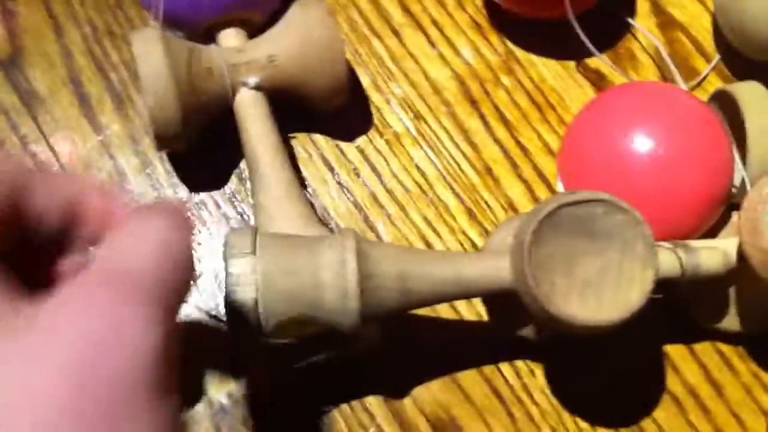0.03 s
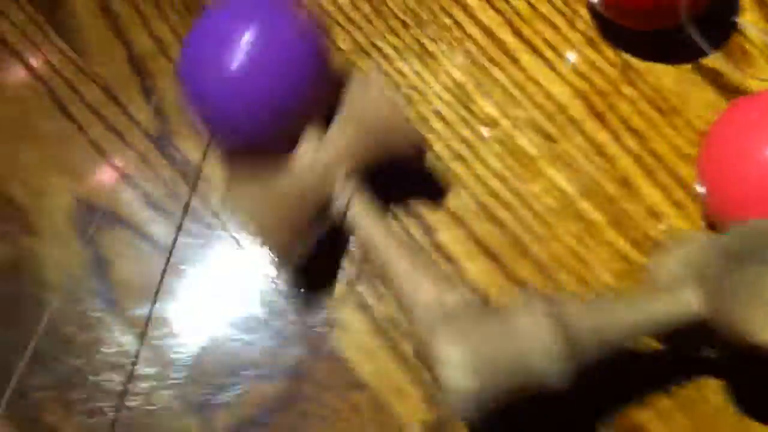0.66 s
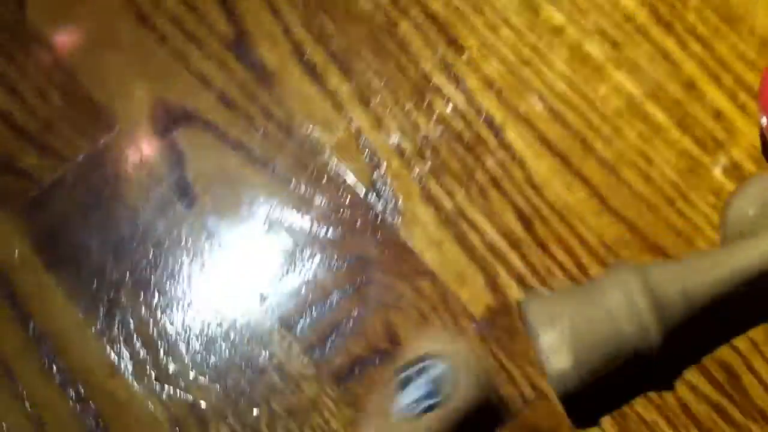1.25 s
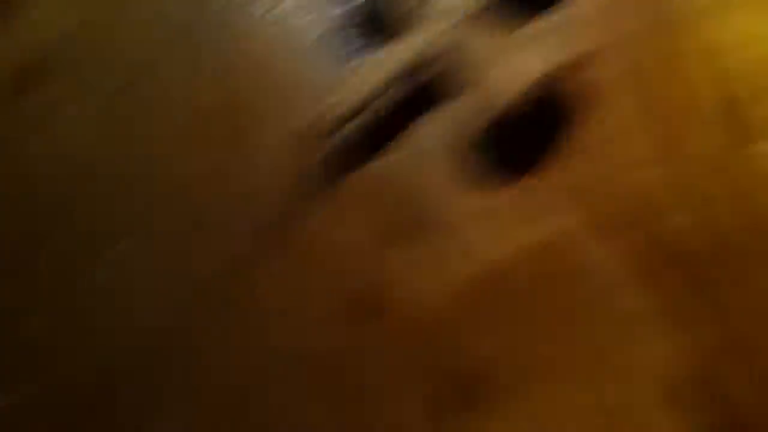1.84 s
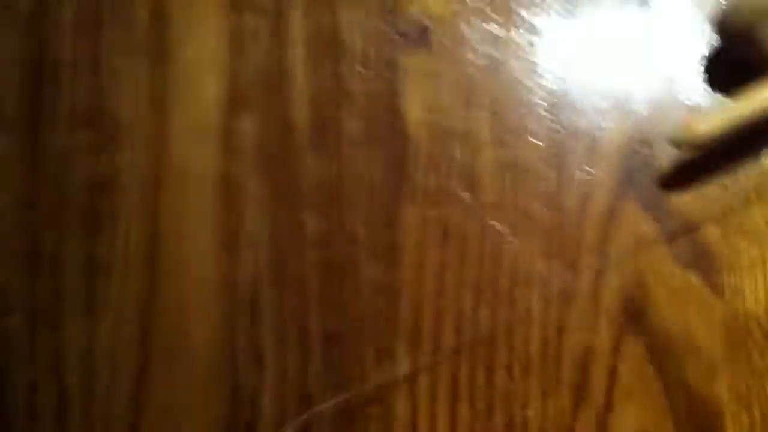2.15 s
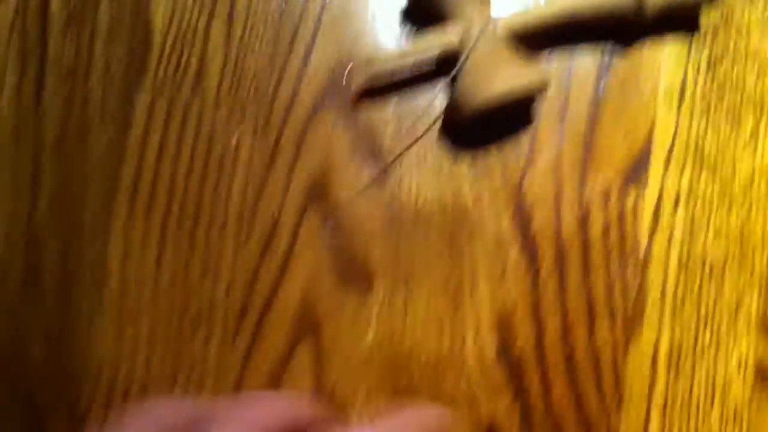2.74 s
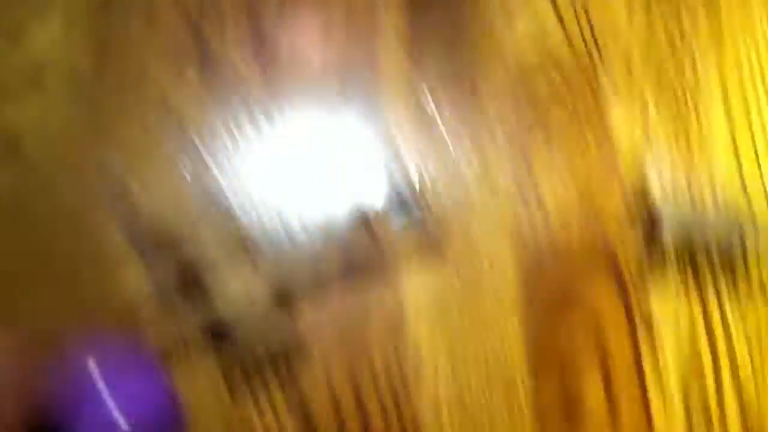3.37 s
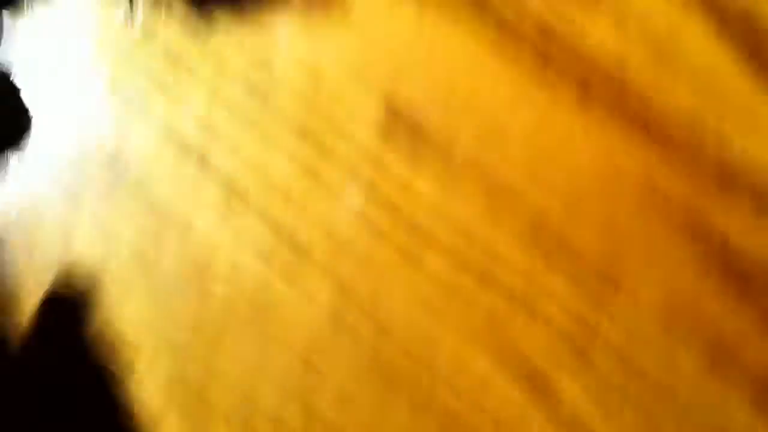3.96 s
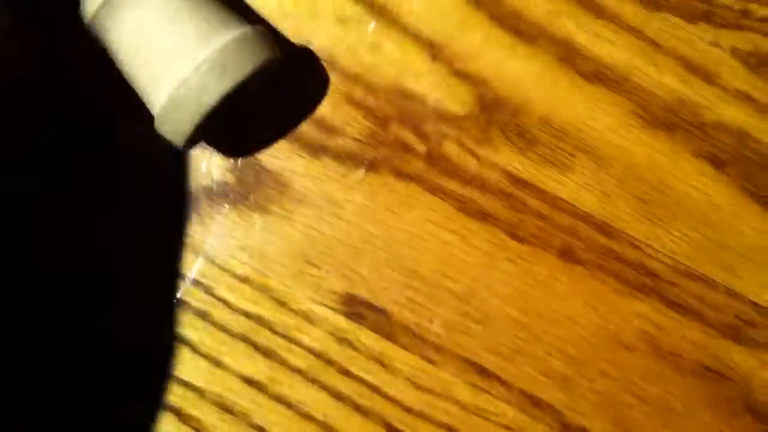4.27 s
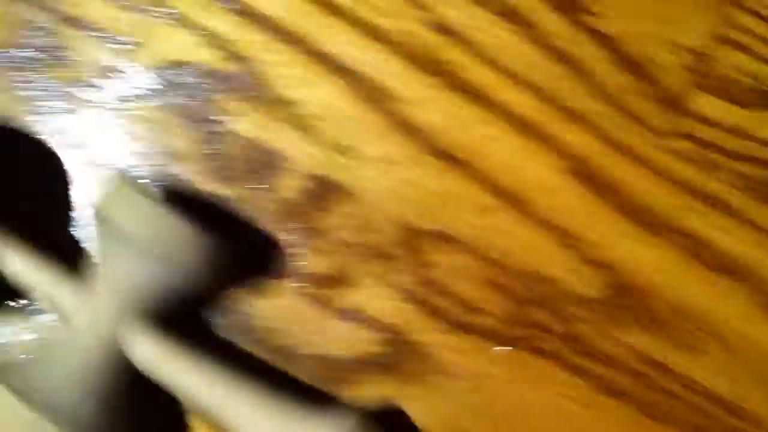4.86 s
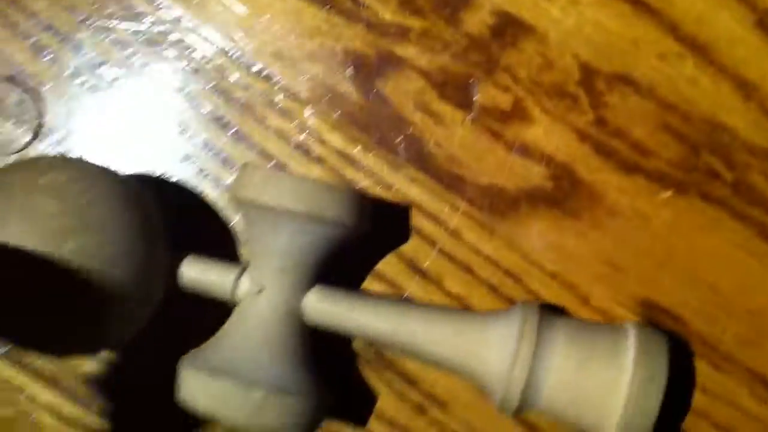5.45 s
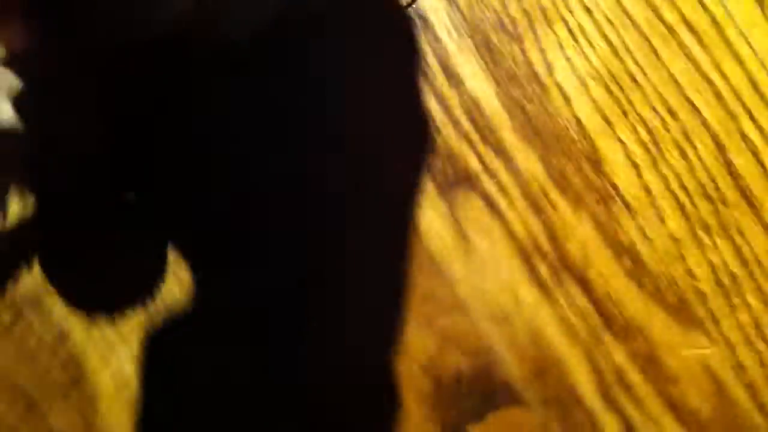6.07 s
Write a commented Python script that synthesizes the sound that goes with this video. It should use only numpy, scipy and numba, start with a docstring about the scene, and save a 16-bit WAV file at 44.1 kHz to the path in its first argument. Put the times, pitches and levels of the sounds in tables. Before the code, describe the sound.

Close to the microphone in a small room, wooden toys tap and clatter against each other and a wooden tabletop. One slides across the table with a bumpy, rumbling scrape, then things go briefly quiet. Harder hollow knocks and short shoves follow, ending with a burst of sharp clacks. Faint hand rubbing and string swishes sit underneath, along with a low electrical hum and hiss.

```python
"""Wooden kendama toys, pushed, rolled and dropped on a varnished table in a small room, microphone close.
Each knock rings the toys and the table top, and some hard clacks end in a run of bounces.
Pulled by its string, a toy judders; between knocks it skips and drags over the grain.
String and fingers swish now and then and a hand rubs softly near the microphone.
Near walls add a short tail; under it all lie a faint mains hum and hiss."""
import sys
import numpy as np
from scipy import signal
from scipy.fft import rfft, irfft
from scipy.io import wavfile
from scipy.ndimage import uniform_filter1d
from numba import njit

SR = 44100
rng = np.random.default_rng(int(sys.argv[2]) if len(sys.argv) > 2 else 0)


def log_audio(samples):
    """Write samples as a 16-bit WAV file to the path given in sys.argv[1]."""
    # one column per channel
    frames = np.atleast_2d(samples).T
    # limit to full scale, then quantise
    limited = np.clip(frames, -1, 1)
    pcm = np.round(limited * 32767).astype(np.int16)
    wavfile.write(sys.argv[1], SR, pcm)


N = 273861
TIME = np.arange(N) / SR

# borders of the ranges of table thud, hollow cup, handle, clack, hard edge and contact tick: edge_hz
RANGE_EDGES = [255, 480, 1050, 1750, 2700, 4200, 15000]
# modes of the toys lying on the table: pitch_hz, level_db, t60_s
TOY_MODES = [(262, -13, 0.0134), (355, 5, 0.02), (423, 1, 0.0046), (594, 4.5, 0.02), (720, 2.5, 0.0087),
             (859, -9.5, 0.07), (1038.4, 5.5, 0.01), (1143, 1, 0.016), (1346, -11.5, 0.055),
             (1647, -3.5, 0.012), (2123, 0.5, 0.007), (2100, -16.5, 0.042), (2620, 9, 0.0016),
             (3000, -15.5, 0.007), (2976, 18, 0.016), (3570, 15, 0.017), (4300, 22.5, 0.052),
             (5530, 25.5, 0.021), (7500, 22, 0.034), (8600, 19, 0.023), (13600, -6.5, 0.012)]
# long, low modes of the table top: pitch_hz, level_db, t60_s
TABLE_MODES = [(173.8, 0.5, 0.35), (228.9, -2, 0.29), (273.5, -4.5, 0.34), (310.6, 6.5, 0.053),
               (459, -21.5, 0.44), (544, -0.5, 0.12)]


def knocks(blows, crack_db, detune, main_db, main_t60_s=0.02, low_cut_hz=205):
    """Every knock favours one ring; its contact shares the energy between table, cup, handle and edge."""
    starts, level_db, main_hz, corner_hz, tick_db, thud_db = blows
    sounds, attack = 0, int(.012 * SR)
    main_rings = np.array([band(ring([(hz, 0, main_t60_s)], .05), hz / 1.5, hz * 1.5) for hz in main_hz])
    for lo, hi in zip(RANGE_EDGES, RANGE_EDGES[1:]):
        favoured = ((lo <= main_hz) & (main_hz < hi))[:, None]
        part = struck_wood(len(starts), lo, hi, crack_db, detune)
        part += favoured * undb(main_db) * main_rings / rms(main_rings)
        gains = contact(lo, hi, level_db, main_hz, corner_hz, tick_db, thud_db)
        sounds = sounds + gains[:, None] * part / rms(part[:, :attack])
    out = np.zeros(N)
    for start, sound in zip(starts, minimum_phase(sounds)):
        add(out, start, sound)
    # such small bodies radiate little bass
    return signal.sosfilt(signal.butter(5, low_cut_hz, "high", fs=SR, output="sos"), out)


def blows_and_bounces(scatter_db=3.5, pitch_spread=0.071, tick_db=-68, thud_db=-5.5):
    """The columns of all blows, single or in runs of bounces; each bounce lands on another spot."""
    # single knocks: start_s, level_db, main_hz, corner_hz, tick_db, thud_db (relative to level_db)
    single_knocks = [(0.2124, -46.5, 554, 778, -76, 0), (0.4495, -49.5, 506, 504, -84, 0),
                     (0.5385, -41, 520, 1200, -62, 1.5), (0.7577, -31, 1530, 2100, -62, -4),
                     (0.7677, -47, 1500, 1900, -62, 10), (0.8062, -39.5, 1400, 1700, -64, -2),
                     (0.8838, -39, 540, 1800, -74, -5), (0.9625, -39.5, 1990, 1940, -68, 2),
                     (1.0044, -31, 2250, 3650, -47, -1), (1.0306, -38.5, 2100, 2510, -78, 0),
                     (1.0818, -35.5, 686, 850, -85, 2), (1.0975, -29.5, 576, 910, -73, -3),
                     (1.1765, -36.5, 725, 1522, -69, 3), (1.2435, -31, 603, 940, -62.5, -6),
                     (1.2645, -42, 620, 830, -70, 10.5), (1.2772, -31, 720, 880, -64, -2.5),
                     (1.29, -42, 720, 871, -73, 2), (1.3033, -39, 736, 950, -64, -2),
                     (1.317, -33.5, 693, 880, -78, -3.5), (1.3485, -26, 2280, 3650, -37.5, 0.5),
                     (1.3858, -35, 2470, 3200, -50, 6), (1.406, -40, 2174, 2870, -59, 6.5),
                     (1.4725, -36, 525, 1050, -66, -1.5), (1.5262, -34.5, 570, 1313, -53, 3),
                     (1.6646, -38.5, 633.4, 1192, -68, 1.5), (2.108, -55.5, 642, 1710, -62.5, -5),
                     (2.914, -43.5, 710, 960, -77, -16), (3.128, -47, 990, 1460, -82, -8),
                     (3.152, -64, 990, 1500, -78, 3), (3.2138, -46.5, 1263, 2100, -79, 3),
                     (4.2131, -39.5, 586.5, 536.2, -59, 1.5), (4.2372, -38.5, 685.6, 578.5, -64.5, -3),
                     (4.3949, -38.5, 545, 1297, -68, 0), (4.4415, -44, 539.4, 1602, -83, 5),
                     (4.4602, -20, 1266, 1730, -46.5, -2), (4.4615, -28, 2120, 2450, -45.5, -14),
                     (4.4842, -43.5, 465, 520.5, -76, 8.5), (4.5395, -45, 930, 1187, -81, 3.5),
                     (4.648, -38.5, 553, 1150, -76, -1), (4.755, -19.5, 1032, 1240, -38, -0.5),
                     (4.9046, -46.5, 1416, 2000, -73, 5.5), (4.957, -51.5, 1740, 2095, -75, 4),
                     (4.9651, -42, 1710, 2408, -76, 1.5), (4.9879, -42, 601.6, 1850, -88, -5),
                     (5.0399, -40, 770, 630, -84, 1), (5.287, -28.5, 850.7, 1148, -62, 1),
                     (5.3342, -27.5, 608, 758, -67, -4.5), (5.357, -34, 611.4, 400, -69, -3.5),
                     (5.4247, -47.5, 606, 1795, -87, -10), (5.4874, -34, 790, 845, -49, 1.5),
                     (5.5516, -36, 542, 875, -68.5, -1), (5.8448, -34, 944, 1037, -51, 3),
                     (5.8988, -44, 550, 534, -76, 4.5), (6.0732, -29, 767, 1390, -48, -2.5),
                     (6.089, -27.5, 930, 920, -50.5, -1.5), (6.1015, -37, 870, 980, -65, 6),
                     (6.1423, -28, 1450, 2500, -45, -7), (6.148, -40, 885, 3000, -41.5, -10),
                     (6.1526, -20, 1130, 2730, -38.5, -2), (6.1538, -19, 810, 1000, -46, -8),
                     (6.1618, -51, 905, 2600, -54, 7), (6.1812, -26.5, 880, 1370, -51, -1)]
    # runs after a hard clack: start_s, end_s, gap_s, uneven (0-1), first_db, last_db, main_hz, corner_hz
    bounce_runs = [(0.778, .84, 0.012, 0.17, -37, -46, 1430, 1920),
                   (1.037, 1.06, 0.0095, 0.39, -40.5, -49.5, 1930, 2400),
                   (1.371, 1.429, .014, 0.2, -47, -45.5, 1350, 2790)]
    rows = list(single_knocks)
    for start, end, gap, uneven, first_db, last_db, main_hz, corner_hz in bounce_runs:
        for s, (jitter, softness, spot) in zip(np.arange(start, end, gap), rng.standard_normal((12, 3))):
            level_db = np.interp(s, [start, end], [first_db, last_db]) - scatter_db * softness
            pitch_hz = main_hz * np.exp(pitch_spread * spot)
            rows.append((s + uneven * gap * jitter, level_db, pitch_hz, corner_hz, tick_db, thud_db))
    return np.transpose(rows)


def contact(lo, hi, level_db, main_hz, corner_hz, tick_db, thud_db):
    """Gain of one range, falling above the contact's corner: a harder contact passes more treble."""
    fall_db_per_octave, ring_db_per_octave, tick_db_per_octave = 24, 2.5, -1
    centre_hz = np.sqrt(lo * hi)
    fall = 1 / np.hypot(1, undb(fall_db_per_octave * np.log2(centre_hz / corner_hz)))
    # high toy-on-toy clacks ring more strongly
    ring_db = ring_db_per_octave * np.log2(main_hz / RANGE_EDGES[1]) * ((lo <= main_hz) & (main_hz < hi))
    low_db = thud_db * (lo == RANGE_EDGES[0])
    tick = undb(tick_db + tick_db_per_octave * np.log2(lo / RANGE_EDGES[-2])) * (lo >= RANGE_EDGES[3])
    return np.hypot(fall * undb(level_db + ring_db + low_db), tick)


def struck_wood(count, lo, hi, crack_db, detune, crack_db_per_octave=-0.5, crack_s=0.004):
    """One range of the wood, a row per blow: clear rings and a noisy crack of crowded, damped modes."""
    modes = [mode for mode in TOY_MODES if lo <= mode[0] < hi]
    tone = np.array([ring(modes, .05, detune, scatter_db=1.5) for _ in range(count)])
    tone = band(tone, lo / 1.25, hi * 1.15)
    crack = rng.standard_normal(tone.shape) * np.exp(-TIME[:tone.shape[1]] / crack_s)
    crack = band(crack, lo, hi, order=3)
    crack_gain = undb(crack_db + crack_db_per_octave * np.log2(lo / RANGE_EDGES[1]))
    return tone / rms(tone) + crack_gain * crack / rms(crack)


def ring(modes, length_s, detune=0, scatter_db=0):
    """Decaying sines after one blow; the toy and the spot that is hit shift their pitch and strength."""
    hz, db, t60 = np.transpose(modes)[:, :, None]
    shift, strength = rng.standard_normal((2, len(hz), 1))
    t = TIME[:int(SR * length_s)]
    fade = np.exp(-np.log(1000) * t / t60)
    sines = np.sin(2 * np.pi * hz * (1 + detune * shift) * t)
    return np.sum(undb(db + scatter_db * strength) * fade * sines, axis=0)


def minimum_phase(sounds, size=8192):
    """A blow at one point starts all rings together, so the energy comes at the front."""
    gain = np.abs(rfft(sounds, size))
    cepstrum = irfft(np.log(gain + 1e-4 * gain.max(axis=-1, keepdims=True)))
    causal = 1 + np.sign(np.fft.fftfreq(size))
    return irfft(np.exp(rfft(cepstrum * causal)))[:, :sounds.shape[1]]


def drag(trim_db=-2.5, usual_hollow_hz=649, hollow_width_hz=360, drift=0.069, bump_db=2.93):
    """A sliding toy's skips shake the boards, ring its hollow and scratch on the varnish."""
    # ranges of the rattle and the scratch: low_hz, high_hz
    ranges = [(540, 1200), (1100, 2700)]
    # two low rings of the boards: pitch_hz, width_hz, level_db
    board_rings = [(260.6, 82, -1), (309.4, 51, -0.5)]
    # shares of rumble, rattle and scratch: level_db at the usual speed, db_per_octave of the hollow ring
    shares = [(-1, -5), (-1, 10.5), (-15.5, 13)]
    strength, hollow_hz = sliding()
    skips = skipping(strength)
    responses = [struck_wood(len(skips), lo, hi, crack_db=-4, detune=0.075) for lo, hi in ranges]
    rattle, scratch = (signal.oaconvolve(skips, wood, axes=1).sum(axis=0)[:N] for wood in responses)
    # the boards' rings shift as the toy travels
    shift = 1 + drift * wander(per_s=4)
    rumble = sum(undb(db) * steep_resonance(skips.sum(axis=0), hz * shift, width * shift)
                 for hz, width, db in board_rings)
    rattle = steep_resonance(rattle, hollow_hz, hollow_width_hz * (hollow_hz / usual_hollow_hz) ** 2)
    scratch = signal.sosfilt(signal.butter(4, 2300, fs=SR, output="sos"), scratch)
    # faster sliding raises the hollow ring and brightens the sound
    out, octaves = 0, np.log2(hollow_hz / usual_hollow_hz)
    for (db, db_per_octave), sound in zip(shares, (rumble, rattle, scratch)):
        power = uniform_filter1d(sound ** 2, size=1500)
        out = out + undb(db + db_per_octave * octaves + trim_db) * sound / np.sqrt(np.abs(power) + 1e-12)
    # ridges of the grain make the drag swell and dip
    bumps = undb(bump_db * wander(per_s=47))
    return strength * bumps * out


def sliding(attack_s=0.018, release_s=0.015):
    """Strength, set by the hand's pressure, and hollow pitch of the toy through its drags and scrapes."""
    # the toy slides on in three stretches, each: time_s, level_db, hollow_hz
    first_slide = [(1.45, -42, 660), (1.49, -35, 685), (1.535, -34.5, 620), (1.57, -43.5, 656.8),
                   (1.645, -42, 665), (1.68, -36, 720), (1.73, -44, 650), (1.8, -55, 575)]
    second_slide = [(1.8, -51, 622.5), (1.844, -43, 590), (1.856, -54, 630), (1.864, -45, 624),
                    (1.884, -56, 710), (1.928, -41.5, 720), (1.99, -42, 820), (2.03, -35, 804),
                    (2.09, -50, 610), (2.144, -51, 726), (2.156, -42, 725), (2.234, -47, 660),
                    (2.272, -44, 750), (2.41, -46.5, 647), (2.446, -56.5, 618), (2.46, -49.5, 636)]
    third_slide = [(2.46, -53, 632), (2.502, -54, 634), (2.522, -46, 653), (2.586, -42, 596),
                   (2.662, -49, 599), (2.684, -45.5, 616), (2.704, -47.5, 570), (2.788, -43, 658.7),
                   (2.84, -66, 611), (2.85, -66, 619)]
    # separate scrapes and shoves: start_s, length_s, level_db, hollow_hz
    scrapes = [(0.707, 0.035, -46.5, 630), (2.862, 0.023, -51, 580), (2.908, 0.036, -37.5, 768),
               (2.983, 0.13, -55, 700), (3.116, 0.047, -35.5, 960), (3.199, 0.034, -37, 845),
               (4.26, 0.078, -40.5, 732.7), (4.36, 0.076, -48.5, 570), (4.525, .025, -48.5, 785),
               (4.618, 0.017, -46.5, 880), (4.646, .095, -42, 620), (4.846, 0.085, -46.5, 555.5),
               (4.985, 0.1, -45, 537), (5.133, 0.35, -56, 598), (5.417, 0.11, -45.5, 614)]
    strength, pitches = np.zeros(N), []
    for stretch in (first_slide, second_slide, third_slide):
        moving = (TIME >= stretch[0][0]) & (TIME < stretch[-1][0])
        strength = np.maximum(strength, moving * undb(curve(stretch)))
        pitches += [(s, hz) for s, _, hz in stretch]
    for start, length, db, hz in scrapes:
        attack = np.clip((TIME - start) / attack_s, 0, 1)
        release = np.exp(-np.maximum(TIME - start - length, 0) / release_s)
        strength += undb(db) * attack * release
        pitches += [(start, hz), (start + length, hz)]
    return uniform_filter1d(strength, size=200), curve(sorted(pitches))


def skipping(strength, uneven=0.5, scatter_db=2.0, rub_db=-12, points=4):
    """Tiny blows from the grain fall in turn on the toy's contact points (a row each), over fine rubbing."""
    usual_per_s, usual_db, db_per_halving = 170, -45.5, 14
    level_db = 20 * np.log10(np.maximum(strength, undb(-55)))
    # a toy that drags harder skips more slowly
    skips_per_s = usual_per_s * 2 ** ((usual_db - level_db) / db_per_halving)
    skips, s = np.zeros((points, N)), 0
    for k, (gap, size) in enumerate(rng.standard_normal((3000, 2))):
        i = int(s * SR)
        if i >= N:
            break
        skips[k % points, i] = undb(scatter_db * size)
        s += np.exp(uneven * gap) / skips_per_s[i]
    return skips + undb(rub_db) * rms(skips) * rng.standard_normal(skips.shape)


def judder(trim_db=-1, jerks_per_s=165, uneven=0.27, scatter_db=2.5, table_db=-11, points=3):
    """Pulled by its string, the toy sticks and slips: quick, nearly even, dull taps shake the table."""
    # strength of the judder: time_s, level_db
    pull = [(.76, -34), (.85, -41), (.91, -35.5), (.98, -36), (1.05, -39), (1.12, -44.5), (1.16, -33),
            (1.185, -37.5), (1.23, -27.5), (1.25, -59), (1.33, -40), (1.39, -29.5), (1.46, -43.5)]
    # damped modes that each jerk strikes: pitch_hz, level_db, t60_s
    jerk_modes = [(250, -38, 0.025), (335.6, -0.5, 0.019), (550, -8.5, 0.036), (720, 3, 0.012),
                  (930, -4.5, 0.014), (1880, -5, 0.013)]
    jerks, s = np.zeros((points, N)), pull[0][0]
    for k, (gap, size) in enumerate(rng.standard_normal((400, 2))):
        if s < pull[-1][0]:
            jerks[k % points, int(s * SR)] = undb(np.interp(s, *np.transpose(pull)) + scatter_db * size)
        s += np.exp(uneven * gap) / jerks_per_s
    taps = np.array([ring(jerk_modes, .05, detune=0.058) for _ in jerks])
    taps = minimum_phase(band(taps, 190, 1080, order=3))
    taps = taps / np.linalg.norm(taps, axis=1, keepdims=True) * np.sqrt(SR / jerks_per_s)
    toy = signal.oaconvolve(jerks, taps, axes=1).sum(axis=0)[:N]
    boards = band(signal.oaconvolve(jerks.sum(axis=0), ring(TABLE_MODES, .5))[:N], 150, 600)
    return undb(trim_db) * (toy + undb(table_db) * boards * rms(toy) / rms(boards))


def swishes():
    """String and fingers brush by in short, soft swells of friction noise, all but one in the treble."""
    # bell-shaped swells: peak_s, spread_s, centre_hz, width_hz, level_db
    swells = [(.475, .022, 10500, 6000, -66), (4.345, .015, 3750, 500, -64), (4.33, .035, 12000, 6000, -67),
              (4.635, .012, 8800, 1800, -65), (5.255, .012, 4450, 450, -58), (5.25, .016, 5800, 900, -62),
              (5.985, .012, 5600, 2400, -55), (5.98, .04, 11000, 8000, -66), (3.72, .06, 115, 80, -66)]
    out = 0
    for peak, spread, hz, width, db in swells:
        noise = band(rng.standard_normal(N), hz - width / 2, hz + width / 2)
        out = out + undb(db) * np.exp(-.5 * ((TIME - peak) / spread) ** 2) * noise / rms(noise)
    return out


def hand_rub(flicker_db=2.5):
    """A hand rubs faintly near the microphone: fine friction in a few resonances."""
    # resonances of the rub: pitch_hz, width_hz, level_db
    rub_rings = [(620, 560, 0.5), (1090, 83, -6), (1790, 300, -14.5), (3300, 370, -14)]
    # strength of the rub: time_s, level_db
    rub_levels = [(0, -112), (.7, -69), (1.9, -63), (2.6, -73), (3.05, -63.5), (3.4, -67.5), (3.75, -76.5),
                  (3.9, -67.5), (4.15, -65.5), (4.6, -66), (5.15, -61.5), (5.6, -67), (6.2, -69)]
    friction, rub = rng.standard_normal(N), 0
    for hz, width, db in rub_rings:
        part = resonance(friction, np.full(N, float(hz)), np.full(N, float(width)))
        rub = rub + undb(db) * part / rms(part)
    grip = np.interp(TIME, np.linspace(0, TIME[-1], 90), rng.standard_normal(90))
    return undb(curve(rub_levels) + flicker_db * grip) * rub


def room(sound, table_db=-52.0, spots=24):
    """The table top rings on; the wall echoes change from spot to spot as toys and microphone move."""
    out = signal.fftconvolve(sound, undb(table_db) * ring(TABLE_MODES, 0.62))[:N]
    step = N // spots
    padded = np.pad(sound, (0, 2 * step))
    for i in range(0, N - step, step):
        piece = padded[i:i + 2 * step] * np.hanning(2 * step)
        add(out, i / SR, signal.fftconvolve(piece, walls()))
    return out


def walls(gap_s=0.0055, build_s=0.0019):
    """The short, dense tail that near walls send back to one spot on the table."""
    # adjoining bands of the tail: top_hz, level_db, t60_s
    tail_bands = [(419, -1, 0.23), (1110, -7, 0.26), (2500, -8.5, 0.25), (4600, -11.5, 0.33),
                  (16000, -13, 0.25)]
    t = TIME[:int(.4 * SR)]
    swell = 1 - np.exp(-np.maximum(t - gap_s, 0) / build_s)
    response, lo = 0, 215
    for hi, db, t60 in tail_bands:
        tail = rng.standard_normal(len(t)) * swell * np.exp(-np.log(1000) * t / t60)
        response = response + undb(db) * band(tail / np.linalg.norm(tail), lo, hi, order=3)
        lo = hi
    return response


def room_tone(air_db=-63, waver=0.21):
    """Still room air, microphone hiss and a slightly wavering mains hum."""
    # spectrum of air and hiss: frequency_hz, relative_density_db
    air_spectrum = [(18, -24), (30, -48), (56, -23.5), (90, -33.5), (100, -19.5), (124, -10.5), (210, -15),
                    (252, -22), (295, -14.5), (649, -29.5), (1860, -35.5), (2600, -36), (4080, -34.5),
                    (5900, -38), (16000, -39)]
    # partials of the hum: pitch_hz, level_db
    hum_partials = [(119.3, -64.5), (240, -73.5)]
    air_hz, density_db = np.transpose(air_spectrum)
    colour_db = np.interp(np.log(np.fft.rfftfreq(N, 1 / SR) + 1), np.log(air_hz), density_db)
    air = irfft(rfft(rng.standard_normal(N)) * undb(colour_db), N)
    drift = waver * np.interp(TIME, np.linspace(0, TIME[-1], 30), rng.standard_normal(30))
    hum = sum(undb(db) * np.sqrt(2) * np.sin(2 * np.pi * hz * TIME + 2 * drift) for hz, db in hum_partials)
    return undb(air_db) * air / rms(air) + hum * (1 + drift)


def undb(db):
    """Decibels to gain."""
    return 10 ** (np.asarray(db) / 20)


def rms(x):
    """Root mean square of each row."""
    return np.sqrt(np.mean(x ** 2, axis=-1, keepdims=True) + 1e-20)


def band(x, lo, hi, order=2):
    """Causal band-pass, edges in Hz."""
    edges = [max(lo, 20), min(hi, SR / 2.1)]
    return signal.sosfilt(signal.butter(order, edges, "band", fs=SR, output="sos"), x)


@njit
def resonance(x, hz, width):
    """State-variable band-pass whose centre and width may move every sample."""
    y, band_state, low_state = np.empty(len(x)), 0., 0.
    for i in range(len(x)):
        g, damping = np.tan(np.pi * hz[i] / SR), width[i] / hz[i]
        swing = (band_state + g * (x[i] - low_state)) / (1 + g * (g + damping))
        band_state, low_state = 2 * swing - band_state, low_state + 2 * g * swing
        y[i] = damping * swing
    return y


def steep_resonance(x, hz, width):
    """Two equal resonances in series."""
    return resonance(resonance(x, hz, width), hz, width)


def curve(table):
    """A table's second column, joined by straight lines over the times in its first."""
    times, values = np.transpose(table)[:2]
    return np.interp(TIME, times, values)


def wander(per_s):
    """Random heights joined by straight lines."""
    return np.interp(TIME * per_s, np.arange(600), rng.standard_normal(600))


def add(track, start_s, sound):
    """Mix a sound into a track."""
    i = int(start_s * SR)
    track[i:i + len(sound)] += sound[:N - i]


def scene(direct_db=0.5, outward_db=1.5, friction_room_db=-3):
    """The toys close up on the table, with the small room behind them, in mono."""
    friction = judder() + drag() + swishes()
    blows = blows_and_bounces()
    direct = undb(direct_db) * knocks(blows, crack_db=-1.5, detune=0.042, main_db=0.5)
    # the walls hear the toys from all sides, so no single ring stands out in the tail
    outward = undb(outward_db) * knocks(blows, crack_db=-1.0, detune=0.022, main_db=-9.5)
    tail = room(outward + undb(friction_room_db) * friction)
    return (direct + friction + tail + hand_rub() + room_tone())[None]


def record(dry, low_cut_hz=45, ceiling=0.97, top_hz=16000):
    """A small microphone that loses the deep bass and rounds the hardest peaks; the top is cut."""
    thin = signal.sosfilt(signal.butter(1, low_cut_hz, "high", fs=SR, output="sos"), dry)
    rounded = thin / (1 + (thin / ceiling) ** 4) ** (1 / 4)
    return signal.sosfilt(signal.ellip(8, .2, 70, top_hz, fs=SR, output="sos"), rounded)


dry = scene()
out = record(dry)
log_audio(out)
```